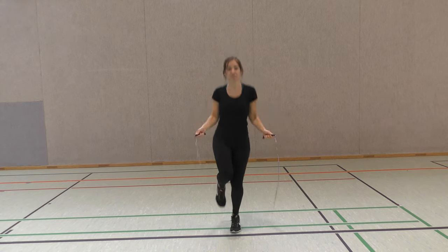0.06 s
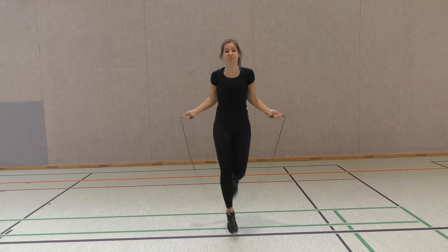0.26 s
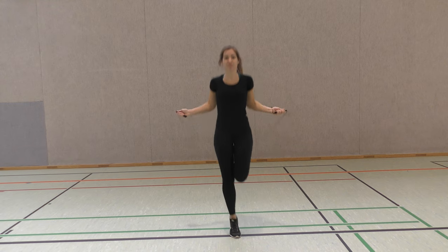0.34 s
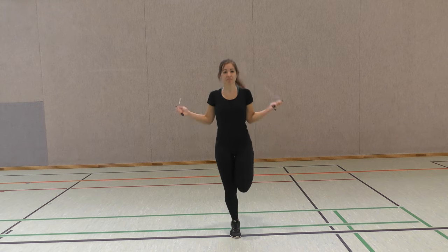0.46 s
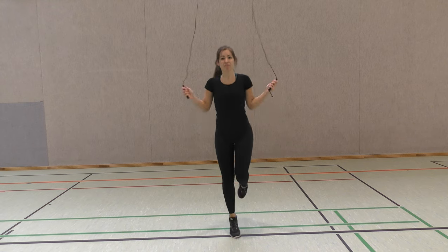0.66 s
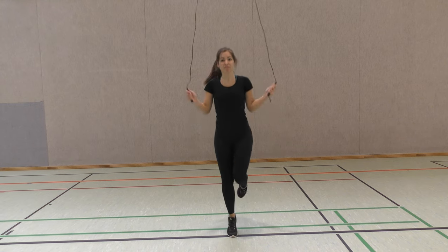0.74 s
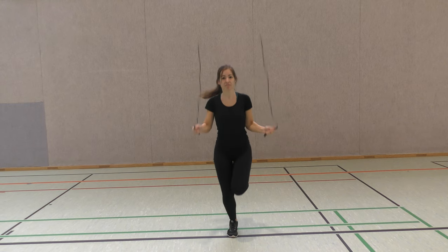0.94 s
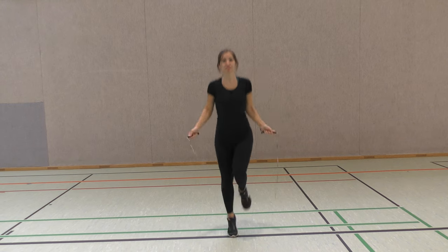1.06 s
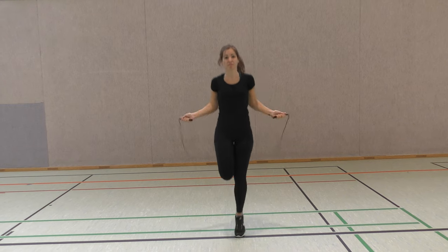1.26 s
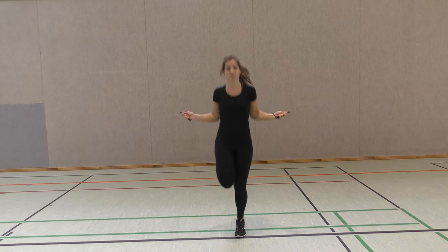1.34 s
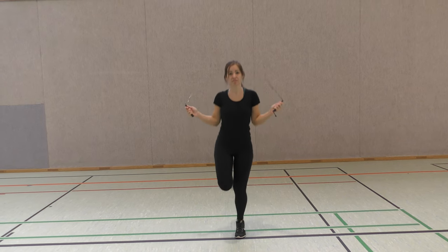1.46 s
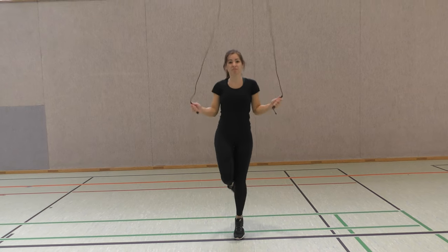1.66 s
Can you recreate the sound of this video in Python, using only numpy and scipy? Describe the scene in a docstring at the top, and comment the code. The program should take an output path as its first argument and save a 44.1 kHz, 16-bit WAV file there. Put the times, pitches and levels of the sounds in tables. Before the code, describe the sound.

A jump rope cracks twice on a gym floor, with soft shoe landings echoing.

```python
"""A skipping rope cracks twice on the sprung floor of a large gym hall, a few metres away.
Each crack is the snap of the cord plus the knock and rattle of the boards; the rope ticks in its
handles and swishes on its way down. Shoes land softly, and the floor booms under the body's weight.
Cracks and landings bend the floor, slap back from the rear wall and then bloom in the hall,
over a quiet bed of room tone."""
import sys
import numpy as np
from scipy import signal
from scipy.fft import irfft
from scipy.io import wavfile

SR = 44100
rng = np.random.default_rng(int(sys.argv[2]) if len(sys.argv) > 2 else 0)


def materialize(psi):
    """Save the field psi as 16-bit PCM at rate SR to the path in sys.argv[1].

    A 1-D psi becomes a single channel; in a 2-D psi each row is a channel.
    """
    bounded = np.clip(np.atleast_2d(psi).T, -1, 1)
    quanta = np.round(bounded * 32767).astype(np.int16)
    wavfile.write(sys.argv[1], SR, quanta)


N = 74970

# room tone, a murmur with hiss on top: (frequency [Hz], level [dB])
ROOM_TONE = [(20, -37), (50, -40), (100, -34.5), (200, -35), (350, -36.5), (550, -50), (1100, -46.5),
             (2300, -47), (3500, -56), (6000, -68), (8500, -66), (11000, -61.5), (15500, -63)]
# stereo image of the noise layers: (frequency [Hz], left-right likeness [0-1])
STEREO_LIKENESS = [(40, 0.63), (200, .94), (1000, 0.85), (3000, 0.7), (5000, 0.66), (9000, 1),
                   (15000, 0.28)]
# decay of the hall's dense early echoes and long tail: (frequency [Hz], t60 [s])
EARLY_DECAY = [(100, 0.75), (1000, 0.39), (4000, 0.65), (9000, 0.21), (15000, 0.25)]
TAIL_DECAY = [(100, 0.87), (400, 2.63), (2000, 3.03), (4500, 1.22), (9000, 0.46), (15000, 0.38)]

# floor heave cues: (time [s], level [dB], settled pitch [Hz])
HEAVE_CUES = [(0.421, -36.5, 48.2), (1.376, -51, 50.7)]
# the floor's rumble in the hall: (frequency [Hz], level [dB])
RUMBLE_EQ = [(20, -28), (40, -2), (60, -3), (100, -4), (200, -19), (1000, -70)]

# landing cues: (time [s], knock [dB], tap [dB], thud [dB], wall echo send [dB], hall [dB])
LANDING_CUES = [(0.3918, 1, -0.5, -37, -6, -32.5), (.7972, -12.5, -6, -44, -5, -43.5),
                (1.3361, 2, 2.5, -30.5, -8.5, -30.5)]
# a shoe's low knock, bright tap and reverb: (frequency [Hz], level [dB])
SOLE_EQ = [(50, -19), (150, 1.5), (350, -2.5), (520, -9.5), (750, 2.5), (1500, -4), (1900, -7), (3000, -29),
           (5000, -32), (12000, -32), (17000, -50)]
TAP_EQ = [(100, -42), (1500, -29), (1950, -18), (2450, -0.5), (2800, -7.5), (3300, -20), (4500, -35),
          (7000, -54)]
SHOE_HALL_EQ = [(40, -8), (100, -13.5), (170, -1.5), (330, 9.5), (430, -4.5), (550, -11.5), (720, -13),
                (1000, -12), (2500, -9.5), (4000, -25), (10000, -43)]
# floor modes under a shoe: (frequency [Hz], level [dB], t60 [s])
BOARD_MODES = [(203, -8, 0.094), (308, -5.5, 0.12), (400.7, -2.5, 0.079), (770, -19, 0.022)]

# rope swing cues: (time [s], tick [dB], swish [dB])
SWING_CUES = [(.1835, -31, -44.5), (.812, -60, -51), (1.128, -31, -45.5)]
# handle tick and rope swish: (frequency [Hz], level [dB])
TICK_EQ = [(300, -7), (2000, -1), (4200, -3), (6500, -14), (11000, -9), (16000, -20)]
SWISH_EQ = [(500, 3.5), (2500, -1.5), (4200, 0), (6000, -13), (8000, -8.5), (11000, 2), (13000, -11),
            (15500, -10)]

# rope crack cues: (time [s], knock [dB], knock pitch [Hz], snap [dB], rattle [dB],
# wall echo send [dB], knock reverb [dB], snap reverb [dB], snap reverb pitch [ratio])
CRACK_CUES = [(0.2451, 15, 2075, 0.5, -22.5, -12.5, -35.5, -34, 1),
              (1.2366, 14.5, 2285, -7, -21.5, -16.5, -36.5, -33.5, 0.93)]
# a crack's three layers, then the reverb of knock and snap: (frequency [Hz], level [dB])
KNOCK_EQ = [(60, -27), (300, -15.5), (650, -21.5), (1200, -10.5), (1550, -8), (1900, -1), (2600, -1),
            (3200, -7), (3700, -8), (4300, -18.5), (5000, -28), (8000, -84)]
SNAP_EQ = [(100, -14), (1500, -58), (4000, -6), (6500, -5.5), (9800, 1.5), (12500, -1.5), (16000, -12)]
RATTLE_EQ = [(100, -8.5), (800, -13), (1300, -7), (2200, 3), (3700, -7.5), (5500, -20), (8000, -22.5),
             (10200, -10.5), (13000, -25), (16000, -20)]
KNOCK_HALL_EQ = [(100, -15), (800, -7.5), (1500, 0), (2300, -2), (3300, -3), (5000, -22), (9000, -38)]
SNAP_HALL_EQ = [(100, -24), (1000, -12.5), (2500, -6), (4200, -1.5), (6000, -4), (7300, -3), (9500, 0.5),
                (12000, -2), (15500, -13.5)]

KNOCK_HZ = 2200  # centre of the untransposed knock
TIME = np.arange(N) / SR


def amp(db):
    """Decibels to gain."""
    return 10 ** (np.asarray(db) / 20)


def curve_at(points, hz):
    """A table's value at hz, on a log-frequency axis."""
    frequencies, values = np.transpose(points)
    return np.interp(np.log(hz + 1), np.log(frequencies + 1), values)


def add(mix, start_s, sound):
    """Lays a sound into the mix, start_s seconds in."""
    part = mix[:, round(start_s * SR):][:, :sound.shape[-1]]
    part += sound[..., :part.shape[1]]


def attack(seconds):
    """A linear fade-in to full level."""
    return np.minimum(TIME / seconds, 1)


def decay(t60, t=TIME):
    """An envelope that falls 60 dB in t60 seconds."""
    return np.exp(-np.log(1000) * t / t60)


def mode(hz, t60):
    """One resonance: a dying sine."""
    return np.sin(2 * np.pi * hz * TIME) * decay(t60)


def click(start_s, eq, lead_s_per_khz=0, transpose=1):
    """A shaped pulse; a lead makes it chirp below 5 kHz, as short bending waves outrun long ones."""
    hz = np.fft.rfftfreq(2 * N, 1 / SR)
    arrival_s = start_s - lead_s_per_khz * (hz < 5000) * (hz - KNOCK_HZ) / 1000
    phase = 2 * np.pi * np.cumsum(arrival_s) * hz[1]
    magnitude = amp(curve_at(eq, hz / transpose))
    return irfft(1j * magnitude * np.exp(-1j * phase))[:N]


def wash(eq, t60=None, size=512, top_hz=15900):
    """Shaped stereo noise: steady, or dying away with one t60 or a table of them."""
    hop = size // 4
    hz = np.fft.rfftfreq(size, 1 / SR)
    frame_s = np.arange(N // hop + 2)[:, None] * hop / SR
    noise = rng.standard_normal((2, N + size))
    bands = signal.stft(noise, nperseg=size, noverlap=size - hop)[2]
    mid, side = bands.transpose(0, 2, 1)[:, :len(frame_s)]
    likeness = np.clip(curve_at(STEREO_LIKENESS, hz), 0, 1)
    mid, side = mid * np.sqrt((1 + likeness) / 2), side * np.sqrt((1 - likeness) / 2)
    stereo = np.array([mid + side, mid - side]) * amp(curve_at(eq, hz)) * (hz < top_hz)
    if t60 is not None:
        stereo *= decay(t60 if np.isscalar(t60) else curve_at(t60, hz), frame_s)
    return signal.istft(stereo.transpose(0, 2, 1), nperseg=size, noverlap=size - hop)[1][:, :N]


def room_tone():
    """The bed: the hall's steady air, and the tail of an earlier landing dying away."""
    air = wash(ROOM_TONE, size=2048) * amp([[0.14], [-0.14]])  # a hair to the left
    return air + amp(-33) * wash(SHOE_HALL_EQ, t60=0.94)


def hall_bloom(eq, transpose=1):
    """The hall's answer to one hit: a burst of dense echoes over a long tail."""
    eq = [(hz * transpose, db) for hz, db in eq]
    return attack(0.014) * (wash(eq, EARLY_DECAY) + amp(-6) * wash(eq, TAIL_DECAY))


def floor_heaves():
    """The low end: the sprung floor takes the weight with a sinking boom and rumbles in the hall."""
    out = np.zeros((2, N))
    sag = 1 + 0.94 / (1 + TIME / 0.021)  # starts sharp and sinks
    for start_s, db, hz in HEAVE_CUES:
        boom = mode(hz * sag, t60=0.37) * amp([[1], [-1]])  # leans left
        rumble = amp(15) * wash(RUMBLE_EQ, t60=0.7, size=2048)
        add(out, start_s, amp(db) * attack(0.027) * (boom + rumble))
    return out


def shoe_landings():
    """A sole knocks and taps on the floor and sets the boards thudding; wall and hall answer."""
    lead_s_per_khz, echo_s, predelay_s = 0.00058, 0.0203, 0.036
    out = np.zeros((2, N))
    boards = sum(amp(db) * mode(hz, t60) for hz, db, t60 in BOARD_MODES)
    hall_ring = amp(-9) * attack(0.013) * mode(hz=701, t60=0.1)
    for start_s, knock_db, tap_db, thud_db, echo_db, hall_db in LANDING_CUES:
        knock = amp(knock_db) * click(start_s, SOLE_EQ, lead_s_per_khz)
        tap = amp(tap_db) * click(start_s, TAP_EQ, lead_s_per_khz)
        thud = amp(thud_db) * boards
        out += knock + tap
        add(out, start_s, thud)
        add(out, echo_s, amp(echo_db) * (knock + tap))
        add(out, start_s + echo_s, amp(echo_db + 1) * thud)  # the wall favours the thud
        add(out, start_s + predelay_s, amp(hall_db) * (hall_bloom(SHOE_HALL_EQ) + hall_ring))
    return out


def rope_swings():
    """The rope ticks in its handles, then swishes through the air."""
    out = np.zeros((2, N))
    for start_s, tick_db, swish_db in SWING_CUES:
        add(out, start_s, amp(tick_db) * wash(TICK_EQ) * decay(t60=0.011))
        add(out, start_s, amp(swish_db) * attack(0.0068) * wash(SWISH_EQ, t60=0.17))
    return out


def rope_cracks():
    """The lead: the cord snaps on the floor, the boards knock and rattle, wall and hall answer."""
    lead_s_per_khz, echo_s, predelay_s = 0.00034, 0.0226, 0.033
    bounces, bounce_span_s = 14, 0.076
    out = np.zeros((2, N))
    for (start_s, knock_db, knock_hz, snap_db, rattle_db,
         echo_db, knock_hall_db, snap_hall_db, snap_hall_pitch) in CRACK_CUES:
        knock = amp(knock_db) * click(start_s, KNOCK_EQ, lead_s_per_khz, transpose=knock_hz / KNOCK_HZ)
        snap = amp(snap_db) * click(start_s, SNAP_EQ)
        out += knock + snap
        add(out, echo_s, amp(echo_db) * (knock + amp(-17.5) * snap))  # the wall favours the knock
        add(out, start_s, amp(rattle_db) * attack(0.00068) * wash(RATTLE_EQ, t60=0.14))
        knock_reverb = amp(knock_hall_db) * hall_bloom(KNOCK_HALL_EQ)
        snap_reverb = amp(snap_hall_db) * hall_bloom(SNAP_HALL_EQ, snap_hall_pitch)
        add(out, start_s + predelay_s, knock_reverb + snap_reverb)
        # single echoes scatter off the side walls and ceiling
        bounce = amp(snap_hall_db + 6.5) * click(start_s + predelay_s, SNAP_HALL_EQ)
        for delay_s, gain in zip(bounce_span_s * rng.random(bounces), rng.standard_normal(bounces)):
            add(out, delay_s, gain * bounce)
    return out


def scene():
    """The mix: rope, shoes and floor over the room tone."""
    return rope_cracks() + shoe_landings() + floor_heaves() + rope_swings() + room_tone()


def record(dry):
    """Master EQ: a low cut at 31 Hz and a steep high cut at 16.7 kHz."""
    low_cut = signal.butter(4, 31, "high", fs=SR, output="sos")
    high_cut = signal.firwin(255, 16700, window=("kaiser", 9), fs=SR)
    return signal.oaconvolve(signal.sosfilt(low_cut, dry), high_cut[None], "same")


dry = scene()
out = record(dry)
materialize(out)
```